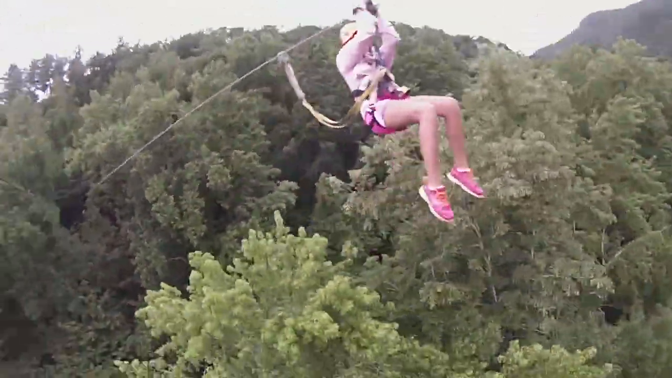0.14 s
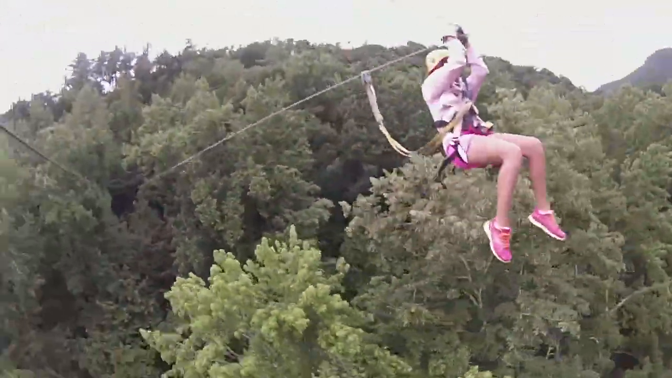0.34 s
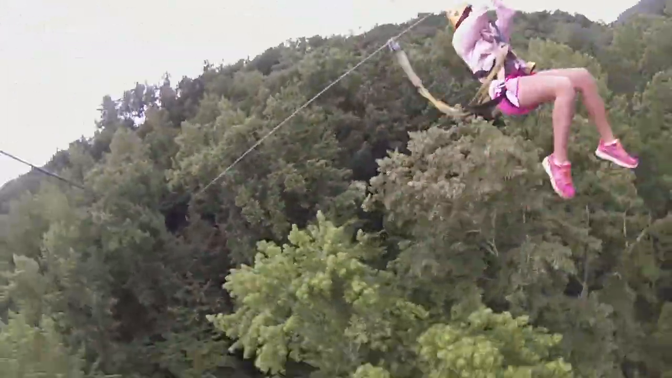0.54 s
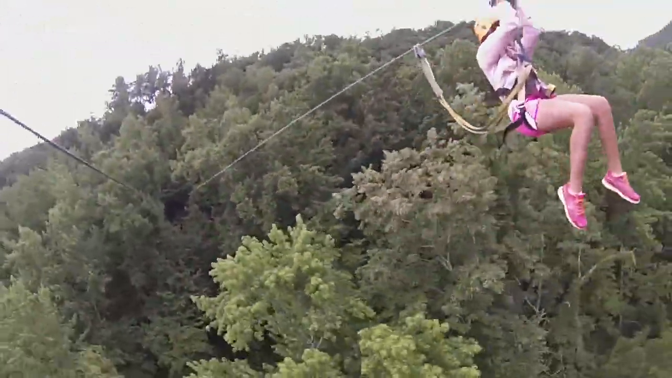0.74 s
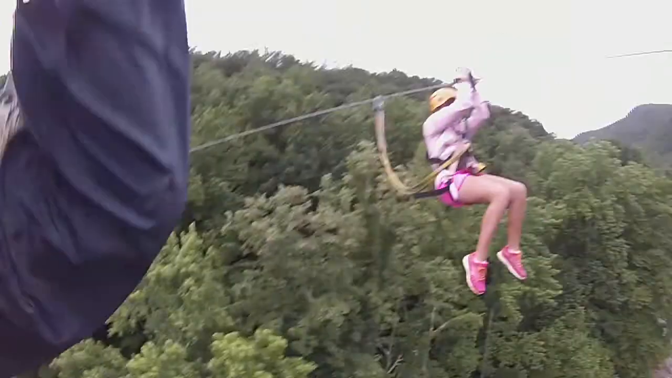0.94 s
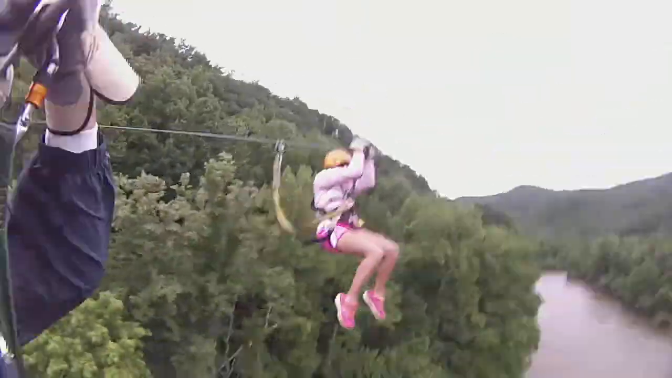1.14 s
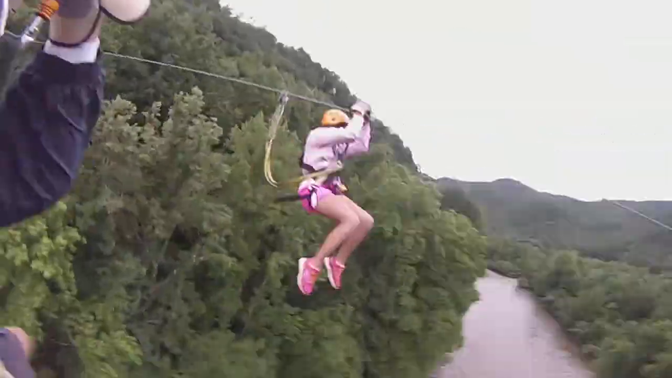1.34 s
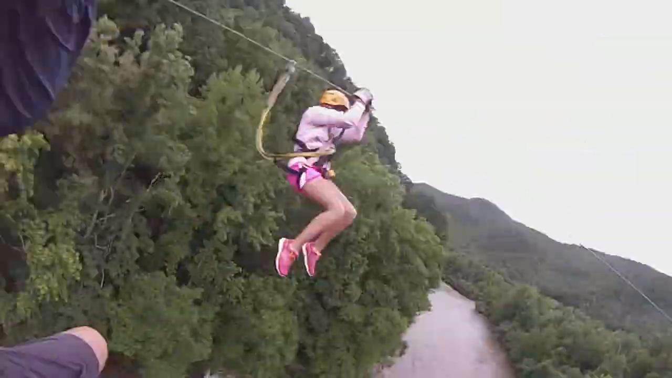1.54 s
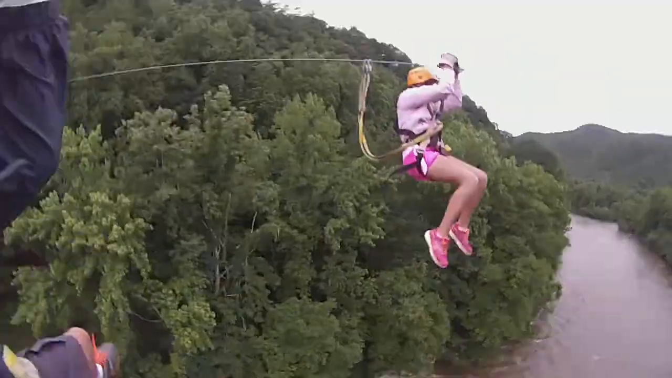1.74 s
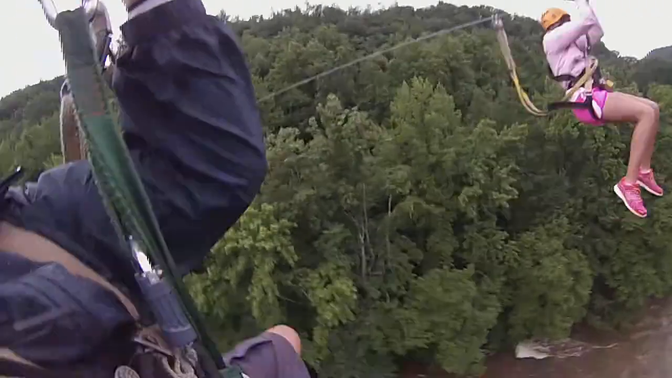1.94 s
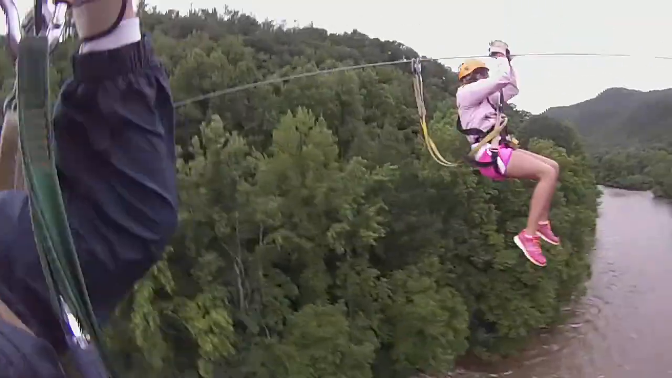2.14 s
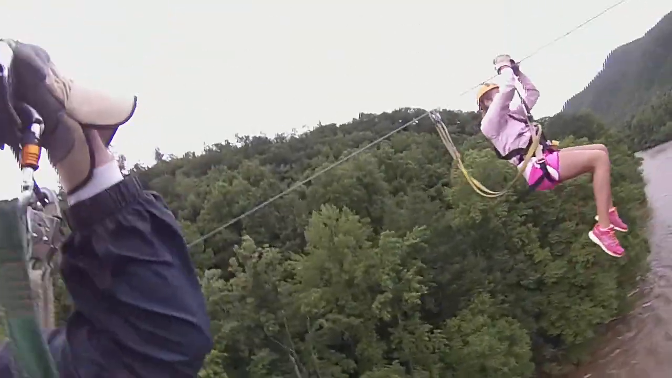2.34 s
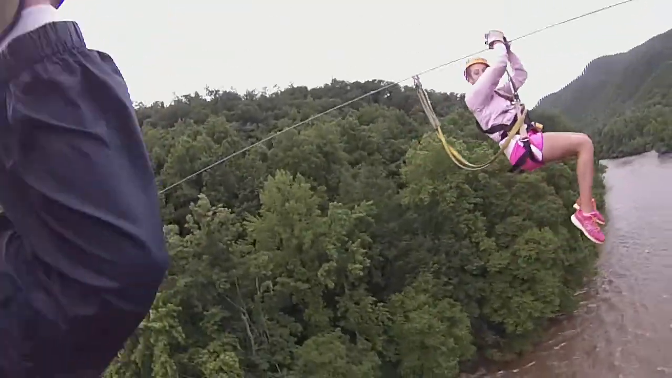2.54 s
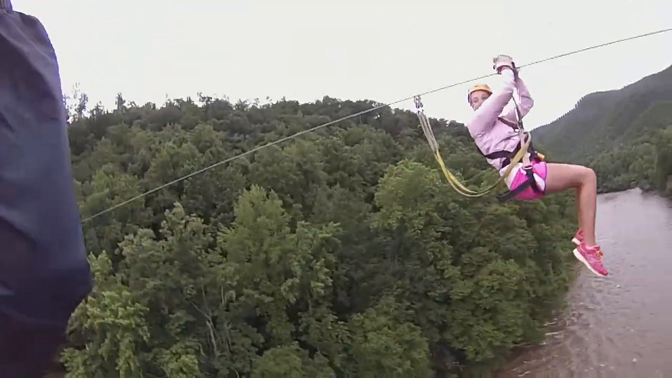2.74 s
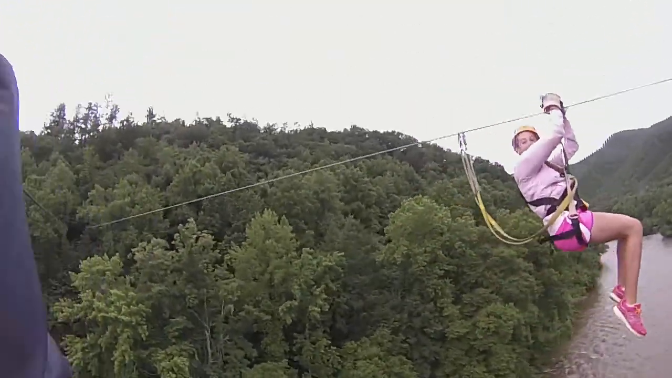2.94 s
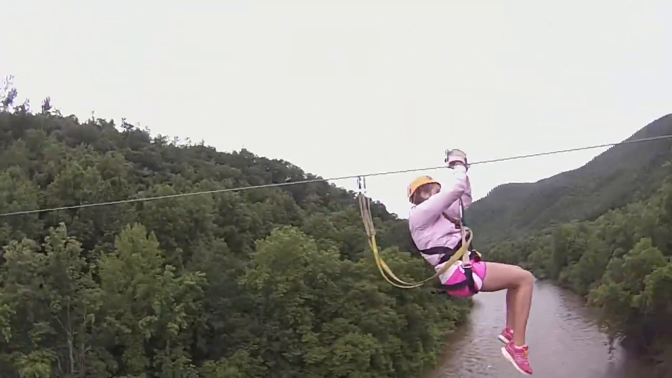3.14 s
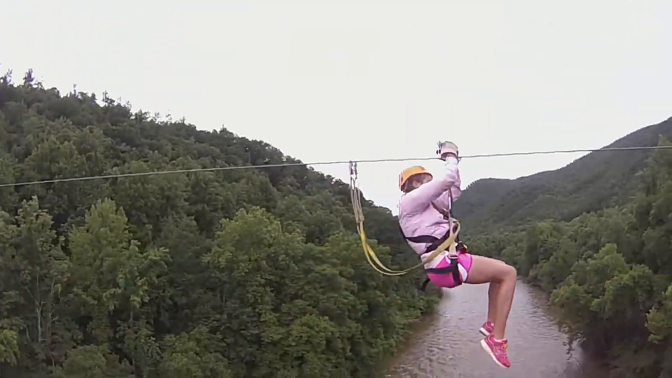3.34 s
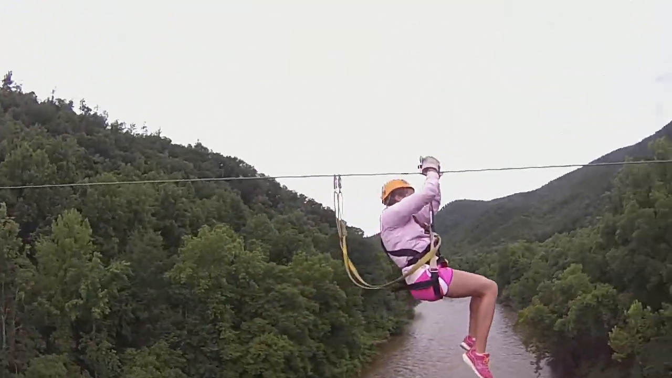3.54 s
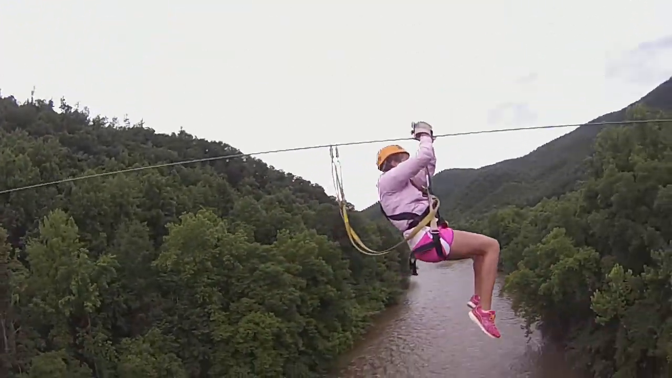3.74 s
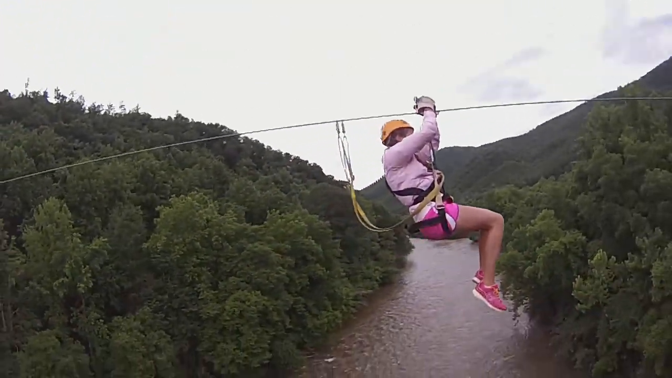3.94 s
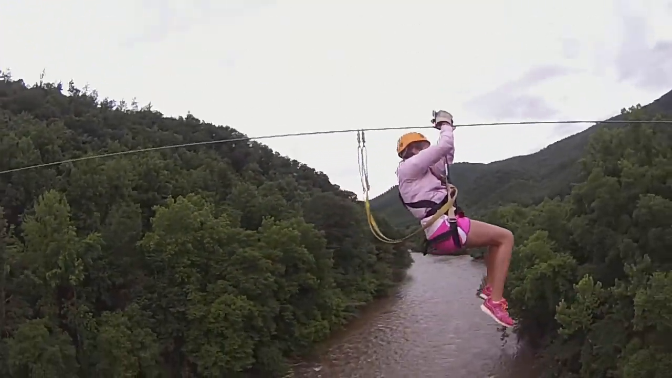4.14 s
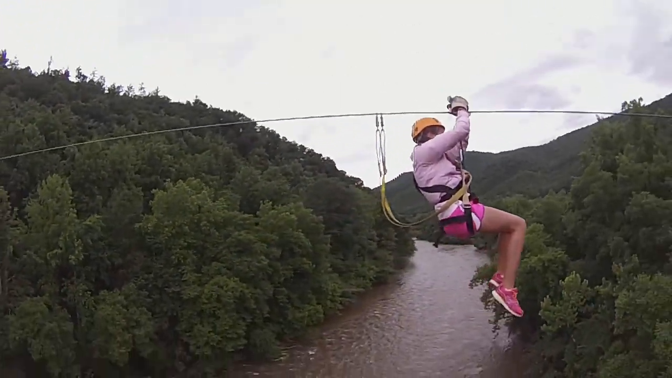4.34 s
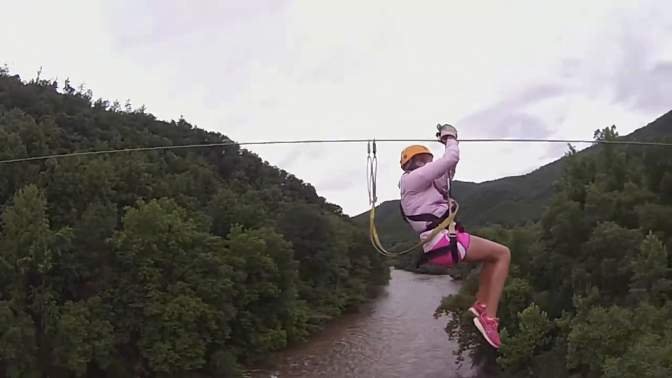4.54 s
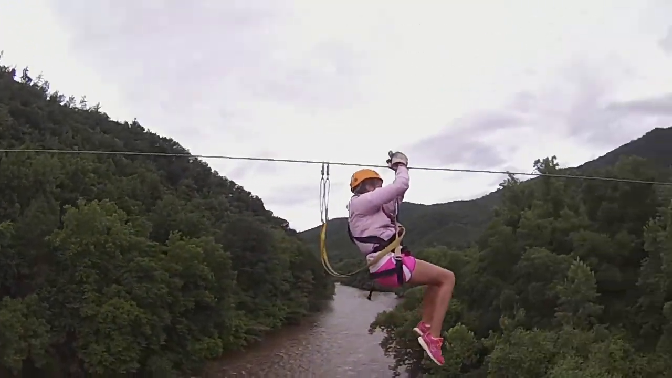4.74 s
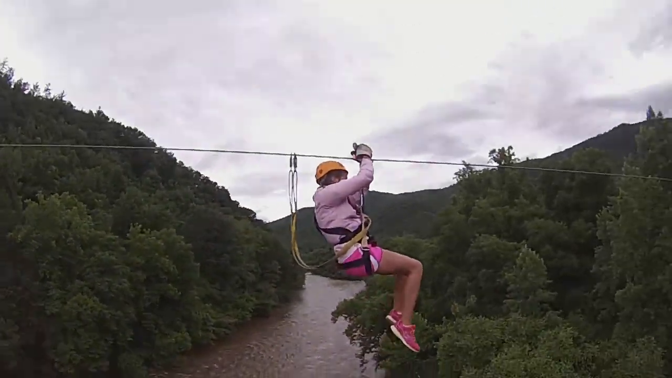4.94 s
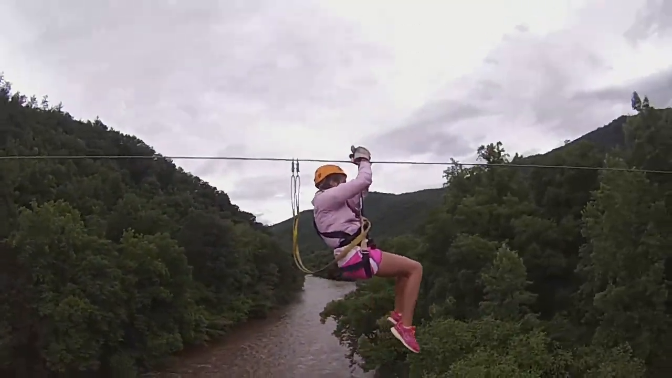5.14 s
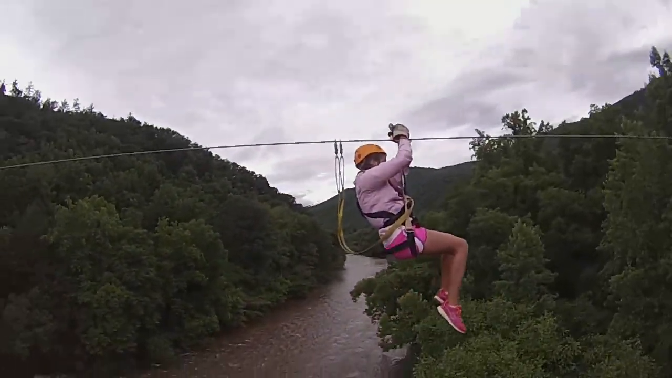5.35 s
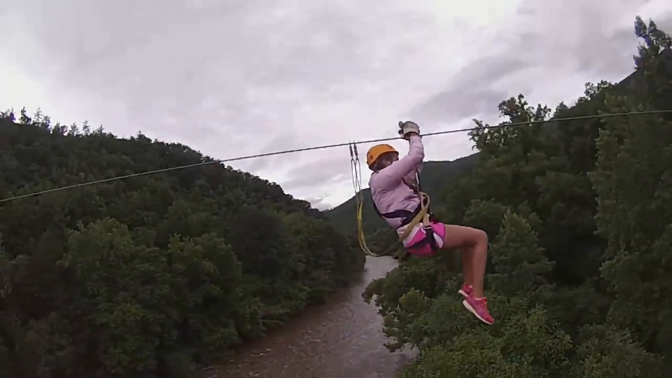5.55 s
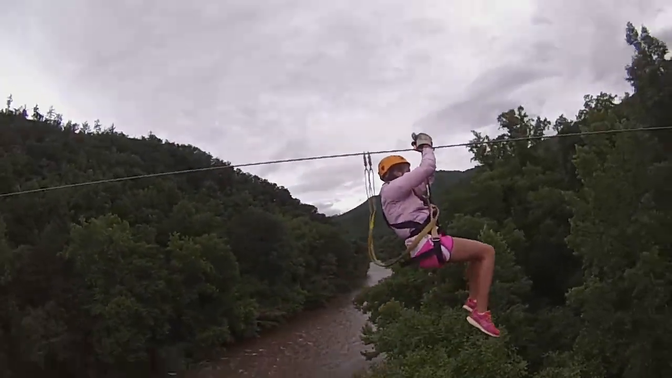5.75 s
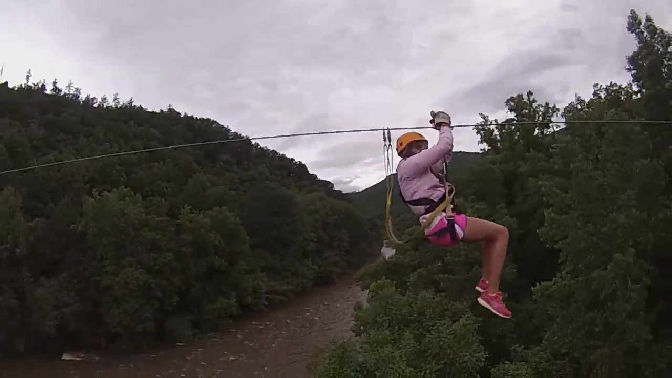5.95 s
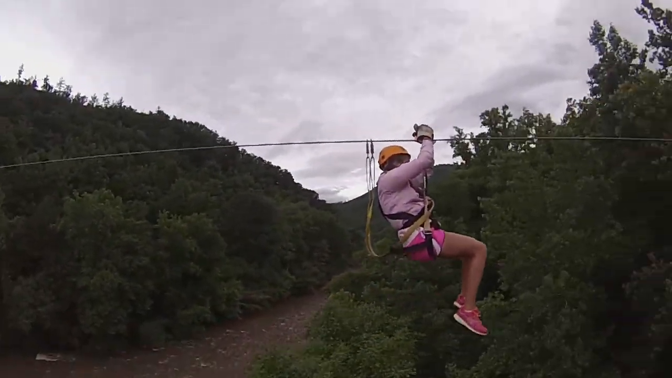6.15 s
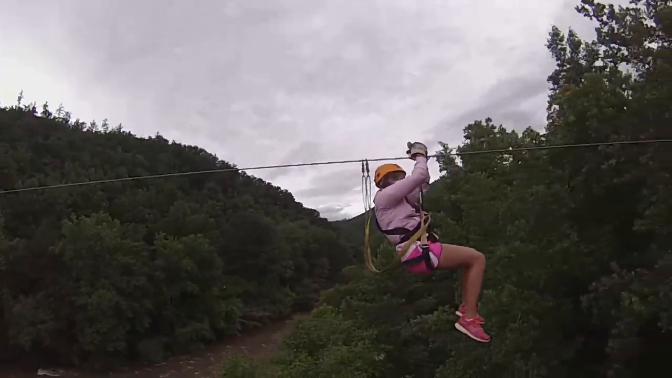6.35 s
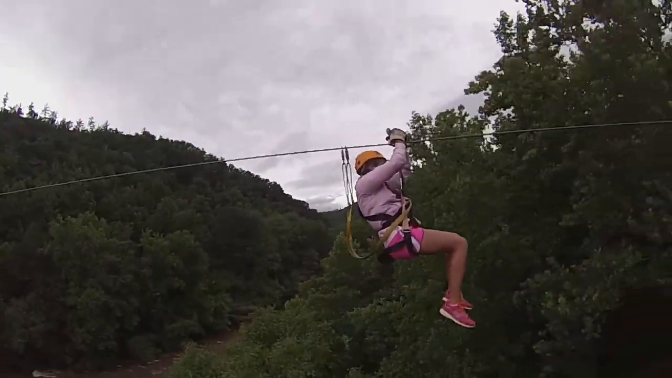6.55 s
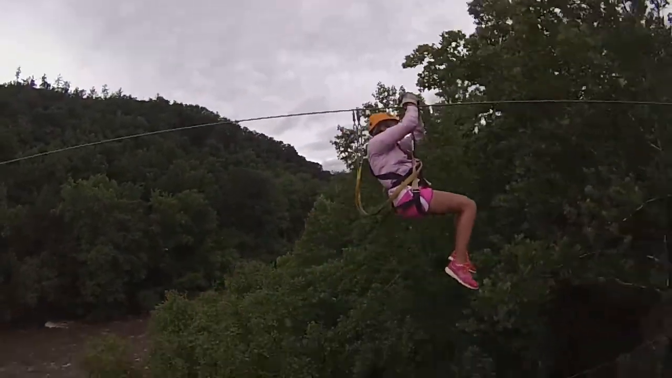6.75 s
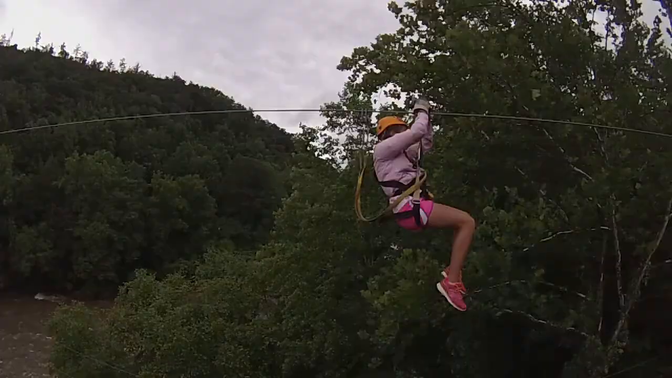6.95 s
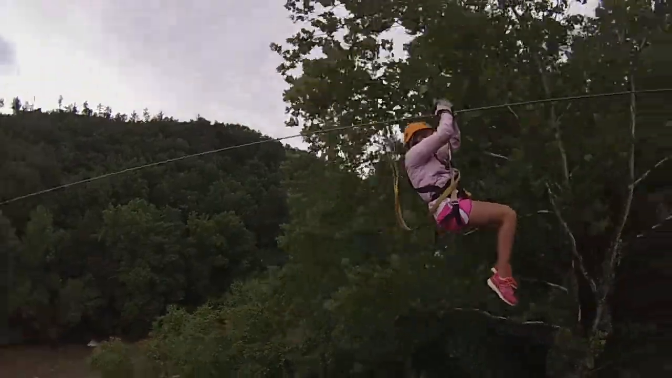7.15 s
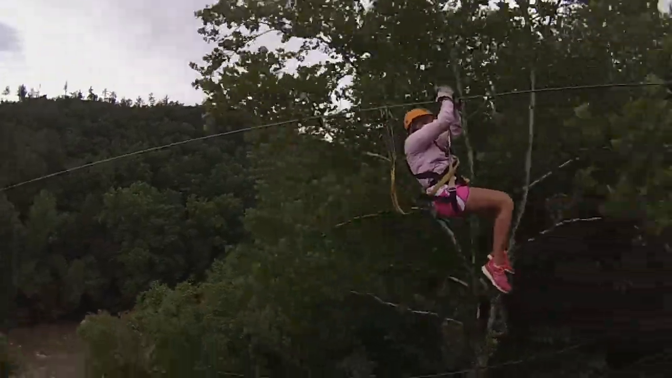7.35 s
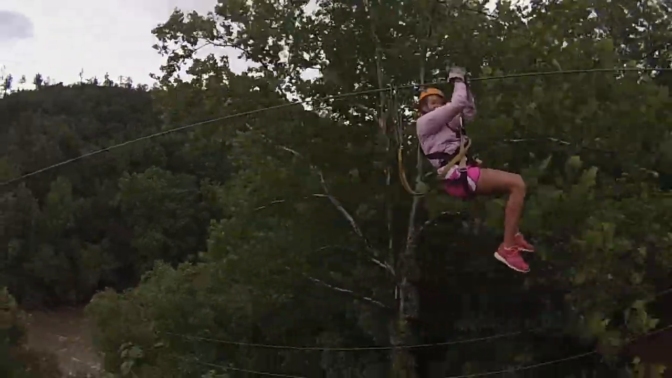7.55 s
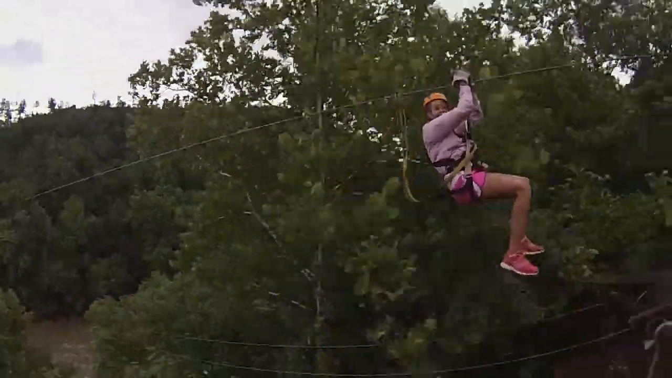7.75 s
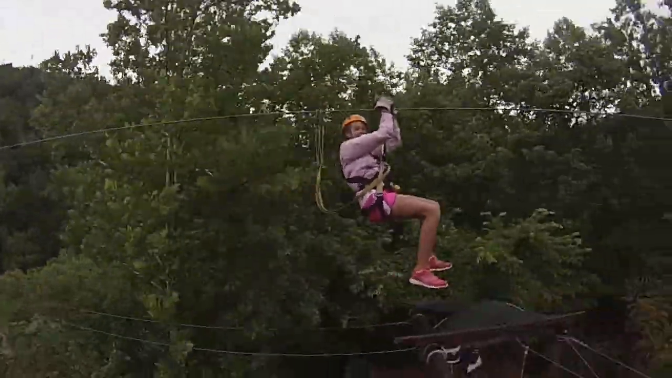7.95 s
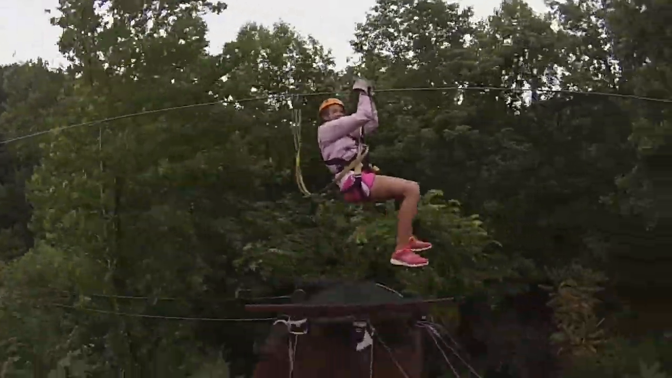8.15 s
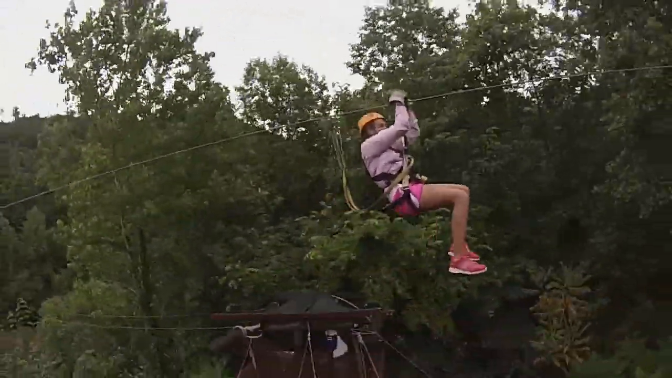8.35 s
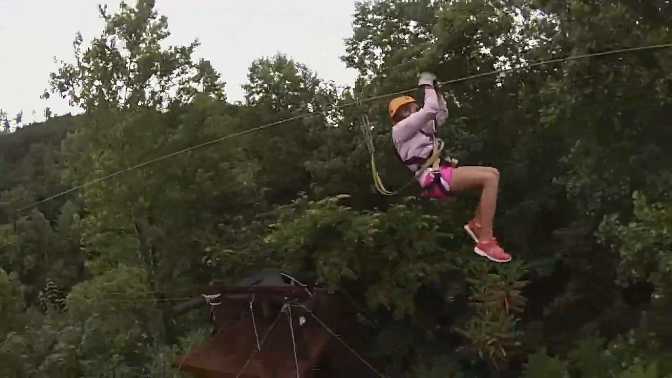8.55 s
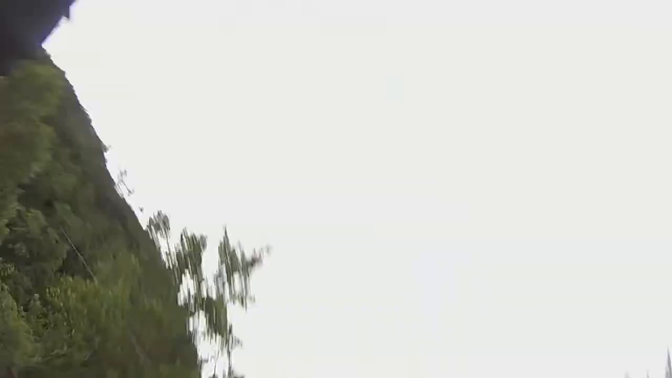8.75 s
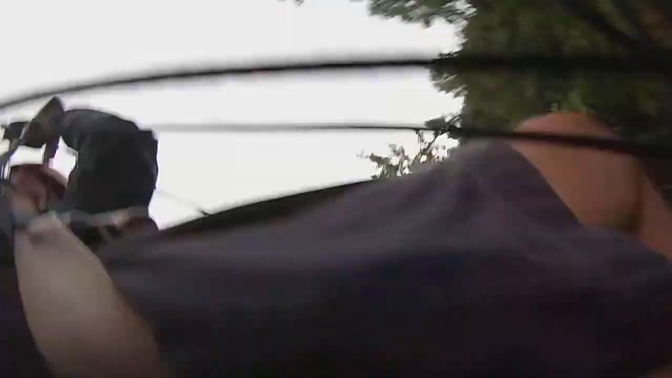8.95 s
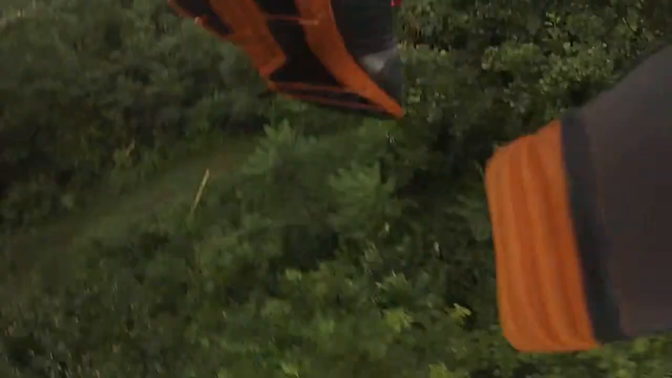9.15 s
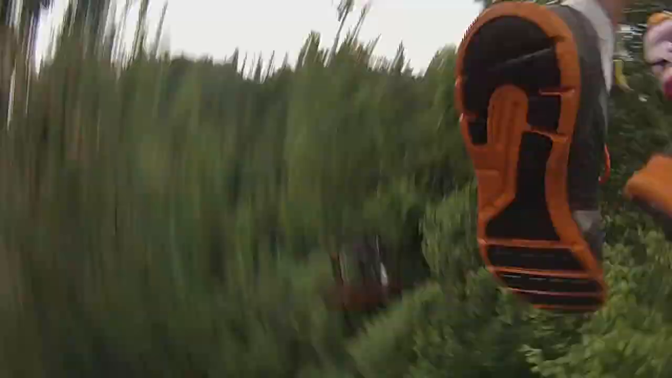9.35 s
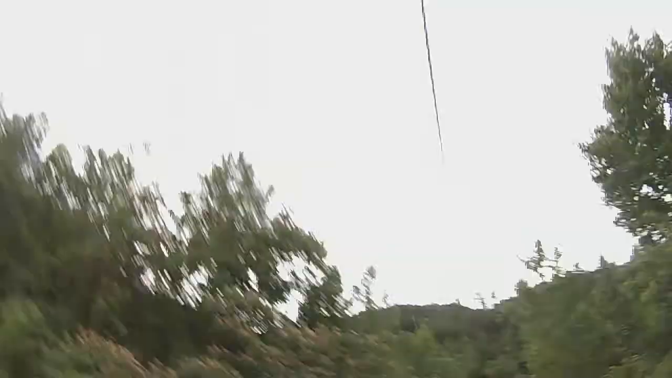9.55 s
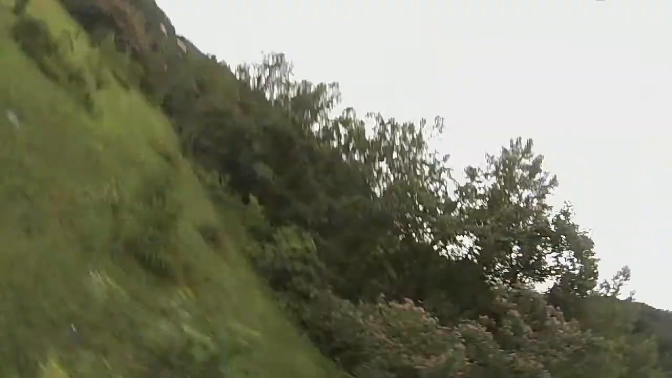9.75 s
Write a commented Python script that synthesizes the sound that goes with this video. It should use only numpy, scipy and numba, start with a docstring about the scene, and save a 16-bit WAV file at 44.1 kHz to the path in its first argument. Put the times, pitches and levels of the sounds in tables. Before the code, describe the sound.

Wind buffets a handheld camera as a zip-line trolley sings higher and breaks into squeals, then fades after a clatter of knocks.

```python
"""A zip line over a valley, heard from a camera in the rider's hand, an arm's length from the trolley.
At first wind buffets the microphone over distant river and trees; a second trolley sings alongside.
The camera is bumped and swung round. The six-strand steel cable drums on the pulleys: a rising whine
over a hiss that rings the trolley's plates, breaking into squeals from about 6 s. Near 9 s the camera
is dropped, its limiter ducks after each blow, and the trolley fades."""
import sys
import numpy as np
from scipy import signal
from scipy.fft import rfft, irfft
from scipy.io import wavfile
from scipy.ndimage import map_coordinates
from numba import njit

SR = 44100
rng = np.random.default_rng(int(sys.argv[2]) if len(sys.argv) > 2 else 0)


def file_out(sig):
    """Save sig as 16-bit WAV at sys.argv[1]."""
    # one column per channel
    cols = np.atleast_2d(sig).T
    # limit, then scale
    lim = np.clip(cols, -1, 1)
    pcm = np.round(lim * 32767).astype(np.int16)
    wavfile.write(sys.argv[1], SR, pcm)


N = 431738
T = np.arange(N) / SR
FREQ = np.maximum(np.fft.rfftfreq(N, 1 / SR), 1)


def undb(db):
    """Decibels to gain."""
    return 10 ** (np.asarray(db) / 20)


def curves(table):
    """Each column of a table, joined by straight lines in time."""
    time_s, *columns = np.transpose(table)
    return [np.interp(T, time_s, column) for column in columns]


def unit(x):
    """Scale to rms 1."""
    return x / np.sqrt(np.mean(np.abs(x) ** 2) + 1e-18)


def noise(gain):
    """Noise of rms 1, shaped by a gain at each frequency."""
    return unit(irfft(rfft(rng.standard_normal(N)) * gain, N))


def colour(points):
    """Gain at each frequency from (freq_hz, level_db) points."""
    hz, db = np.transpose(points)
    return undb(np.interp(np.log(FREQ), np.log(hz), db))


def resonance(hz, width_hz):
    """Gain of a steep resonance."""
    return 1 / (1 + .5 * ((FREQ ** 2 - hz ** 2) / (FREQ * width_hz)) ** 2)


def drift(rate_hz):
    """Random drift of spread 1, mostly slower than the given rate."""
    return noise(1 / (1 + (FREQ / rate_hz) ** 4))


# spectrum of the river and trees: freq_hz, relative_db
VALLEY_COLOUR = [(290, -23), (500, -9.5), (709, -8), (990, -14.5), (1730, -0.5), (3060, -11.5), (3470, -8),
                 (4160, -5), (4340, -19.5), (6690, -12.5), (14000, -40)]

def valley():
    """Far below the line, the river and the trees hiss steadily."""
    low_cut = 1 / (1 + (400 / FREQ) ** 2)
    return noise(colour(VALLEY_COLOUR) * low_cut) * undb(-38 + 0.8 * drift(12))


# strength of the wind at the microphone: time_s, buffet_db, rush_relative_db
WIND_LEVELS = [(0, -22, -41.5), (.3, -39, -39), (.7, -26, -36.5), (1.05, -24.5, -46), (1.3, -20, -38.5),
               (2.05, -15.5, -38), (2.35, -27.5, -40), (2.8, -26.5, -50), (3.25, -29.5, -37.5),
               (4.1, -35.5, -40.5), (6.4, -33, -40.5), (7.5, -36.5, -35.5), (8.6, -27.5, -43.5),
               (9.8, -40.5, -42.5)]
# spectrum of the buffeting: freq_hz, relative_db
BUFFET_COLOUR = [(15, 10.5), (35, 9), (70, -10.5), (115, -25.5), (200, -38), (400, -49), (1000, -78),
                 (3000, -120)]
# spectrum of the passing air: freq_hz, relative_db
RUSH_COLOUR = [(35, -17), (60, -1), (93, -1), (166, -9.5), (306, -15.5), (355, -18), (551, -25),
               (740, -26.5), (960, -20.5), (1630, -120)]

def wind():
    """Right on the microphone, gusts buffet the port over a rush of air."""
    buffet_db, rush_db = curves(WIND_LEVELS)
    gust_db = 2 * drift(rate_hz=2)
    buffet = noise(colour(BUFFET_COLOUR)) * undb(buffet_db + gust_db + 3.7 * drift(29))
    rush = noise(colour(RUSH_COLOUR)) * undb(rush_db + 0.5 + 2.4 * drift(11.7))
    return buffet + rush


# the second trolley's run: time_s, strand_rate_hz, level_db
NEIGHBOUR_RUN = [(0, 783, -35), (.3, 801, -29.5), (1.05, 818, -39.5), (1.3, 833.8, -27), (1.6, 829, -31.5),
                 (2, 916.3, -55), (4.3, 886.6, -28.5), (5.3, 885, -40), (6.5, 927.4, -40), (8.8, 910, -33),
                 (9.2, 876, -55)]

def neighbour_trolley():
    """One cable away: only the clean second partial of its strand rate carries across."""
    strand_hz, level_db = curves(NEIGHBOUR_RUN)
    phase = 2 * np.pi * np.cumsum(strand_hz * (1 + 0.0006 * drift(25))) / SR
    flutter_db = 2.5 * drift(10)
    return unit(np.sin(2 * phase)) * undb(level_db + flutter_db)


def add(out, start_s, sound):
    """Mix a sound in at its start time."""
    i = int(start_s * SR)
    out[i:i + len(sound)] += sound[:N - i]


# soft bumps on the camera: start_s, relative_db, pitch_hz, decay_s
BUMPS = [(0.899, -7, 181, 0.003), (0.9066, 9.5, 59, 0.012), (1.427, 8, 45, 0.0016),
         (1.549, -4.5, 89.2, 0.0048), (3.187, -34, 170, 0.0046), (3.293, -37, 168, 0.0074),
         (8.776, 8.5, 68.5, 0.0021), (8.859, 2, 51, 0.0027), (9.0583, 19, 107, 0.005),
         (9.163, -4, 94, 0.012), (9.1793, 13, 390, 0.0011), (9.189, 3, 48, 0.0077)]

def bumps(rise_s=0.00093):
    """Each bump shoves air into the microphone port, where it swings briefly."""
    out, t = np.zeros(N), T[:SR // 8]
    for start_s, db, pitch_hz, decay_s in BUMPS:
        envelope = np.exp(-t / decay_s) * (1 - np.exp(-t / rise_s))
        add(out, start_s, -undb(db) * np.sin(2 * np.pi * pitch_hz * t) * envelope)
    return out


# modes of the camera case: pitch_hz, t60_s, relative_db
CASE_MODES = [(732, 0.036, -15), (1340, 0.065, -38), (1480, 0.038, -11), (2030, 0.021, -3),
              (2360, 0.01, -1.5), (3500, 0.017, -7), (5030, .012, -9), (5800, 0.0092, -5.5),
              (6900, 0.0077, -1), (7500, .007, -5)]
# hard blows on the case: start_s, peak_db, brightness_hz
KNOCKS = [(1.4308, -6.5, 1690), (9.0571, -3, 5770), (9.061, 8, 1910), (9.1, 9.5, 1110), (9.105, 3, 1000),
          (9.12, 15, 7000), (9.161, -5, 900), (9.1797, -7, 602), (9.1978, -9, 2400), (9.4994, -17, 1114)]

def knocks(ring_db=1, crack_decay_s=.0007):
    """Hard blows crack and ring the case around the microphone; softer contact gives less treble."""
    out, t = np.zeros(N), T[:SR // 8]
    ring = sum(undb(ring_db + db - 60 * t / t60_s) * np.sin(2 * np.pi * hz * t)
               for hz, t60_s, db in CASE_MODES)
    for start_s, peak_db, brightness_hz in KNOCKS:
        crack = 1.1 * rng.standard_normal(len(t)) * np.exp(-t / crack_decay_s)
        contact = signal.butter(2, brightness_hz, fs=SR, output="sos")
        blow = signal.sosfilt(contact, ring + crack)
        add(out, start_s, -undb(peak_db) * blow / np.abs(blow).max())
    return out


# rubs on the case: middle_s, level_db, spread_s, centre_hz
SCUFFS = [(0.909, -24, 0.011, 260), (8.784, -32, 0.0081, 553), (8.876, -22, 0.016, 2680),
          (8.877, -29.5, .016, 850), (8.926, -26.5, 0.0021, 510), (8.941, -32, 0.0045, 590),
          (8.959, -48, .05, 8300), (9.099, -15, 0.0035, 1300), (9.112, -16, 0.011, 700),
          (9.15, -22, 0.0057, 2770), (9.178, -24, 0.017, 590), (9.464, -23, 0.0071, 2160)]

def scuffs():
    """Beside the microphone, fingers and cloth stick and slip on the case in tiny jerks."""
    out = np.zeros(N)
    jerks = unit(undb(3.5 * drift(350)))
    for middle_s, db, spread_s, hz in SCUFFS:
        envelope = np.exp(-.5 * ((T - middle_s) / spread_s) ** 2)
        out += undb(db) * jerks * envelope * noise(resonance(hz, 1.25 * hz) ** 3)
    return out


def scattered_paths(x, depth_db, patch_hz, patch_s):
    """Paths off the swaying rider and the trees add and cancel: spectral patches swell and fade."""
    freq_hz, time_s, spectrum = signal.stft(x, SR, nperseg=1024)
    patches = rng.standard_normal((400, 400))
    place = np.meshgrid(freq_hz / patch_hz, time_s / patch_s, indexing="ij")
    gain = undb(np.interp(time_s, T, depth_db) * map_coordinates(patches, place, order=3, mode="wrap"))
    gain /= np.sqrt(np.mean(gain ** 2, axis=0))
    return signal.istft(spectrum * gain, SR)[1][:N]


def sleeve_reflection(x, swing, lag_s=.0009, wander_octaves=.35):
    """A sleeve near the microphone reflects the hiss; ripples glide through it as the path changes."""
    delay_s = lag_s * 2 ** (wander_octaves * drift(2.44))
    reflection = map_coordinates(x, [(T - delay_s) * SR], order=3, mode="mirror")
    gain = .36 * swing
    return (x + gain * reflection) / np.hypot(1, gain)


# resonances of the trolley: centre_hz, width_hz, relative_db
TROLLEY_RINGS = [(1596, 373, 5.5), (2154, 315, 6), (2516, 190, 0), (3794, 288, 3.5), (4600, 204, -3),
                 (4850, 59, 6), (5240, 780, -2.5), (5270, 370, -1.5), (5975, 210, -8), (7490, 560, -3),
                 (8005, 464, -1.5), (9550, 730, -23.5), (11630, 1200, -26), (14200, 2300, -39)]
# broad rolling hiss heard side-on, with a peak at the whine's pitch: freq_hz, relative_db
SIDE_ON_COLOUR = [(590, -71), (1000, -36.5), (1270, -15.5), (1630, -4.5), (2140, -27.5), (2420, -30),
                  (2650, -29), (3250, -21.5), (3940, -19.5), (4410, -11), (6410, -9.5), (7600, -9.5),
                  (9430, -24.5), (11600, -27), (15000, -51)]
# bands of the hiss (frame, plate, pulley, bearing): low_hz, high_hz
HISS_BANDS = [(1000, 3000), (3000, 4300), (4300, 6400), (6400, 16000)]
# balance of those bands: cruise_db, db_per_octave_of_speed, full_swing_db
BAND_BALANCE = [(-2, -3.5, 0.5), (-1.5, -1, 4.5), (2.5, 21.5, 1), (-2.5, 0, 0.5)]
# lift of two of the bands: time_s, plate_db, bearing_db
BAND_LIFTS = [(0, 0.5, -0.5), (.9, 0, -2.5), (1.05, -5, 0), (1.9, -1.5, 2.5), (2.4, 1, -1), (2.72, -8, 4.5),
              (3.3, 1.5, -2.5), (3.7, -2.5, -1), (4.6, -4, 0.5), (5.3, -1.5, 1.5), (6.5, 1.5, 2),
              (8.3, 1, 1.5), (9.1, -0.5, 4)]

def rolling_hiss(strand_hz, swing, cruise_hz=900):
    """Just overhead, rough steel rings the trolley; swung round, the microphone hears it side-on."""
    rings = np.sqrt(sum((undb(db) * resonance(hz, width)) ** 2 for hz, width, db in TROLLEY_RINGS))
    speed_octaves = np.log2(strand_hz / cruise_hz)
    # the contact pressure chatters in all bands together
    chatter_db = 0.17 * drift(220) + 0.46 * drift(60)
    plate_db, bearing_db = curves(BAND_LIFTS)
    lifts_db = (0, plate_db, 0, bearing_db)
    hiss = 0
    for (low_hz, high_hz), (db, speed_db, swing_db), lift_db in zip(HISS_BANDS, BAND_BALANCE, lifts_db):
        band = 1 / np.sqrt((1 + (low_hz / FREQ) ** 20) * (1 + (FREQ / high_hz) ** 20))
        ringing = np.sqrt(1 - swing) * noise(band * rings)
        side_on = np.sqrt(swing) * noise(band * colour(SIDE_ON_COLOUR))
        band_db = db + lift_db + speed_db * speed_octaves + swing_db * swing
        hiss += (ringing + side_on) * undb(band_db + chatter_db + 0.52 * drift(27))
    return scattered_paths(hiss, depth_db=1.8 + 1.7 * swing, patch_hz=140, patch_s=.13)


def partials(twist, table, rough_hz, flutter_db):
    """Partials of the cable's twist; uneven strands roughen each in size and phase."""
    out = 0
    for multiple, db, roughness in table:
        grit = drift(rough_hz) + 1j * drift(rough_hz)
        wave = (1 + roughness * grit) * np.exp(1j * multiple * twist)
        out += undb(db + flutter_db * drift(5.1)) * unit(wave.real)
    return out


def at_speed(strand_hz, best_hz, range_hz, best_db, other_db):
    """Gain of a voice that grows as the strand rate nears the one where it sings best."""
    nearness = np.exp(-.5 * ((strand_hz - best_hz) / range_hz) ** 2)
    return undb(other_db + (best_db - other_db) * nearness)


def swells(table, attack_s=0.028, release_s=0.052):
    """Gain of a series of swells, each with attack, hold and release."""
    gain = 0
    for start_s, length_s, db in table:
        rise = np.clip(.5 + (T - start_s) / attack_s, 0, 1)
        fall = np.clip(.5 + (start_s + length_s - T) / release_s, 0, 1)
        gain += undb(db) * rise * fall
    return gain


# partials of the drone: twist_multiple, relative_db, roughness
DRONE_PARTIALS = [(1, -2.5, 0.99), (7, -1, 3.04)]

def twist_drone(twist, strand_hz):
    """The cable's twist drones faintly under the trolley."""
    gain = at_speed(strand_hz, best_hz=875, range_hz=25, best_db=-17, other_db=-42)
    return gain * partials(twist, DRONE_PARTIALS, rough_hz=26.2, flutter_db=-3.5)


def wire_sizzle(twist, strand_hz):
    """Near top speed the single wires sizzle: one high, very rough partial."""
    gain = at_speed(strand_hz, best_hz=940, range_hz=47, best_db=-16.5, other_db=-38)
    return gain * partials(twist, [(63, 0, 8)], rough_hz=380, flutter_db=1)


# course of the hum: time_s, relative_db
HUM_LEVELS = [(0, -50.5), (1.9, -58), (2.4, -43), (3.7, -41), (4.85, -37.5), (5.4, -42.5), (6.1, -38.5),
              (7.55, -41), (8.05, -46), (8.8, -51.5), (9.3, -66)]
# partials of the hum: twist_multiple, relative_db, roughness
HUM_PARTIALS = [(6, 6, 0.16), (7, -8, 1.7), (18, 3.5, 0.33)]

def strand_hum(twist):
    """The strands drum on the pulleys and hum at the rate they pass."""
    hum_db, = curves(HUM_LEVELS)
    return undb(hum_db - 5) * partials(twist, HUM_PARTIALS, rough_hz=48.31, flutter_db=1.54)


# partials either side of the whine: twist_multiple, relative_db, roughness
SIDE_PARTIALS = [(11, -2.3, 0.69), (13, 0.5, 1)]
# spells of rocking: start_s, length_s, relative_db
ROCKING_SWELLS = [(2.95, .4, -14), (5.9, 0.95, -6.5), (7.03, 0.638, -6)]

def pulley_rocking(twist, floor_db=-9.5):
    """The twist rocks the pulley, and side tones swell round the whine."""
    gain = np.hypot(undb(floor_db), swells(ROCKING_SWELLS))
    return gain * partials(twist, SIDE_PARTIALS, rough_hz=53.13, flutter_db=0.5)


# partials of the whistle: twist_multiple, relative_db, roughness
WHISTLE_PARTIALS = [(35, -9.5, 0.61), (36, 0, 0.9), (37, 0, 1.1), (38, 1, 3.5), (39, -8, 0.77)]

def pulley_whistle(twist, strand_hz, swing):
    """High partials climb through the pulley's resonance and fade as the microphone swings away."""
    drive = partials(twist, WHISTLE_PARTIALS, rough_hz=70.6, flutter_db=1)
    whistle = unit(irfft(rfft(drive) * resonance(5370, width_hz=570), N))
    gain = at_speed(strand_hz, best_hz=847, range_hz=72, best_db=4.5, other_db=-11.5)
    return gain * np.sqrt(1 - swing) * whistle


# partials of the squeal: twist_multiple, relative_db, roughness
SQUEAL_PARTIALS = [(24, -3.5, 0.28), (25, -10.5, 0.99)]
# bursts of squealing: start_s, length_s, relative_db
SQUEAL_SWELLS = [(2.28, 0.34, -7), (5.7, 0.21, -8), (6.38, 0.19, 3.5), (6.68, 0.16, 2.5), (7.16, .55, 3),
                 (7.77, 0.2, 9.5), (8, 0.51, 3), (8.52, 0.28, 8.5)]

def plate_squeal(twist, strand_hz):
    """The trolley's plate breaks into a squeal an octave above the whine."""
    speed_gain = at_speed(strand_hz, best_hz=931, range_hz=4.5, best_db=2.5, other_db=-24)
    gain = np.hypot(speed_gain, swells(SQUEAL_SWELLS))
    return gain * partials(twist, SQUEAL_PARTIALS, rough_hz=41.7, flutter_db=-0.16)


# partials of the whine: twist_multiple, relative_db, roughness
WHINE_PARTIALS = [(11, -15.5, 1), (12, 0, 0.18), (13, -37, 1), (18, -23, 0.33), (24, -19.5, 0.21)]
# moments when the pulley bites: start_s, length_s, relative_db
BITE_SWELLS = [(1.15, .17, 8.5), (1.35, 0.075, 7.5), (2.11, 0.18, 8), (2.31, .35, 4.5), (3.01, .14, 2.5),
               (3.53, .15, -0.5), (4.7, .31, 0), (7.03, 0.23, -6), (7.56, 0.18, -0.5), (7.97, 0.15, 3.5),
               (8.1, 0.78, -2.5), (8.91, 0.12, 6.5)]

def pulley_whine(twist, strand_hz):
    """An arm's length away, the pulley locks onto the strands and whines at twice their rate."""
    speed_gain = at_speed(strand_hz, best_hz=852, range_hz=37, best_db=-6.5, other_db=-8)
    gain = np.hypot(speed_gain, swells(BITE_SWELLS))
    return gain * partials(twist, WHINE_PARTIALS, rough_hz=46.3, flutter_db=2.45)


# speed of the rider's trolley, as strands passed per second: time_s, strand_rate_hz
TROLLEY_SPEED = [(0, 752), (.3, 767), (.85, 780.5), (1.05, 762), (1.33, 814), (1.8, 803.6), (1.95, 809),
                 (2.1, 806), (2.3, 829), (2.52, 841), (2.75, 839), (3.5, 859.3), (4, 876.4), (4.4, 869.5),
                 (4.85, 892.7), (6, 925.6), (7.6, 929), (8.7, 936.2), (9.8, 899)]
# its loudness at the microphone, for every voice but the hum: time_s, relative_db
TROLLEY_LEVELS = [(0, -32), (.1, -28.5), (.2, -33.5), (.7, -34.5), (.9, -27), (.93, -37.5), (1.03, -33),
                  (1.25, -26), (1.42, -33), (1.55, -29), (1.61, -36), (1.87, -27), (2.6, -24), (3.4, -25),
                  (4.6, -26), (5, -24), (6.6, -23.5), (8.76, -25.5), (8.81, -34.5), (8.95, -28),
                  (9.05, -32.5), (9.17, -53), (9.8, -46)]
# how far the microphone is swung side-on to the trolley: time_s, share_0_to_1
MICROPHONE_SWING = [(0, 0.16), (.9, 0.24), (1.1, 0.7), (2.45, 0.95), (2.75, 0.38), (3.1, 0.38), (3.5, 0.04),
                    (8.76, 0.06), (8.88, 0.62)]

def scene(strands=6):
    """The cable's twist runs under the pulleys; all meets at one hand-held microphone."""
    strand_hz, = curves(TROLLEY_SPEED)
    trolley_db, = curves(TROLLEY_LEVELS)
    swing, = curves(MICROPHONE_SWING)
    wobble = .006 * noise(resonance(7, width_hz=4)) + .003 * drift(60)  # the trolley rocks
    twist = 2 * np.pi * np.cumsum(strand_hz * (1 + wobble)) / SR / strands  # phase in radians
    background = valley() + wind() + neighbour_trolley()
    handling = bumps() + knocks() + scuffs()
    hiss = sleeve_reflection(rolling_hiss(strand_hz, swing), swing)
    cable = twist_drone(twist, strand_hz) + wire_sizzle(twist, strand_hz)
    singing = (pulley_rocking(twist) + pulley_whistle(twist, strand_hz, swing)
               + plate_squeal(twist, strand_hz) + pulley_whine(twist, strand_hz))
    trolley = strand_hum(twist) + undb(trolley_db) * (hiss + cable + singing)
    return (background + handling + trolley)[None]


@njit
def follow(x, attack, release):
    """Envelope that rises fast and falls slowly."""
    envelope, level = np.empty(len(x)), 0.
    for i in range(len(x)):
        level += (abs(x[i]) - level) * (attack if abs(x[i]) > level else release)
        envelope[i] = level
    return envelope


def record(dry, attack_s=0.00089, release_s=0.071, ceiling_db=-4, top_hz=15300):
    """The camera's limiter ducks after overloads; peaks that get through clip, and the top is cut."""
    envelope = follow(dry[0], 1 / (attack_s * SR), 1 / (release_s * SR))
    overload = np.maximum(envelope / undb(ceiling_db), 1)
    limited = np.clip(dry / overload, -1, 1)
    return signal.sosfilt(signal.ellip(10, .2, 80, top_hz, fs=SR, output="sos"), limited)


dry = scene()
out = record(dry)
file_out(out)
```